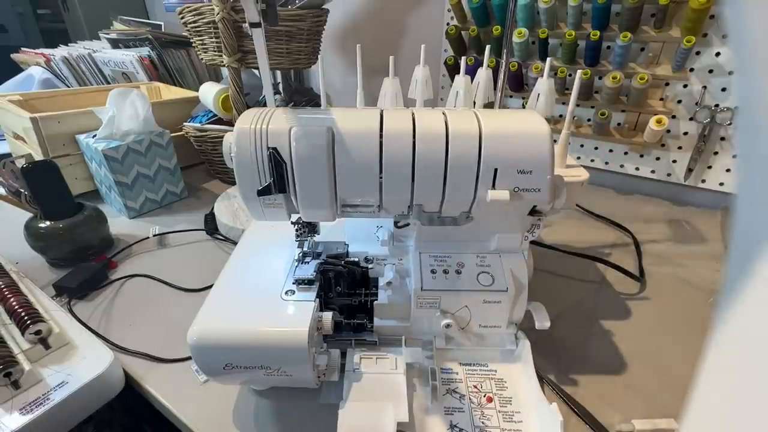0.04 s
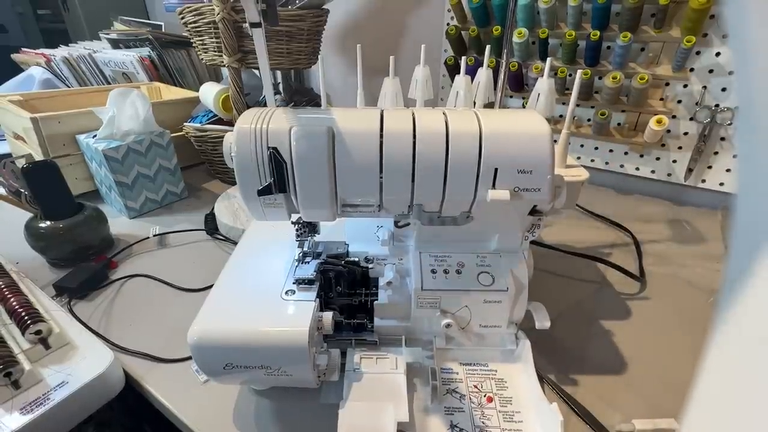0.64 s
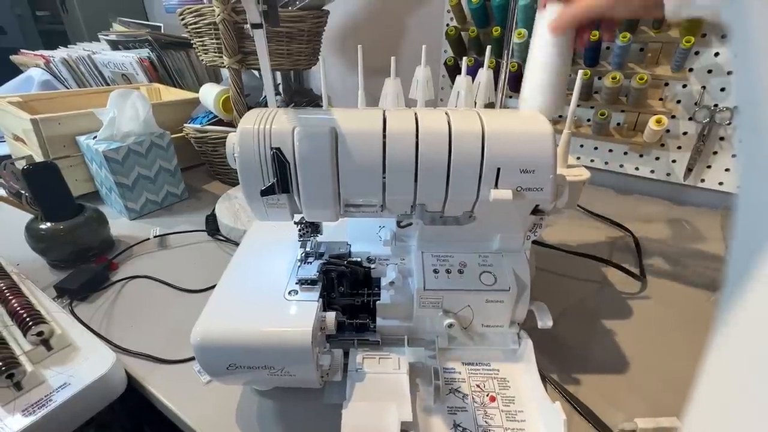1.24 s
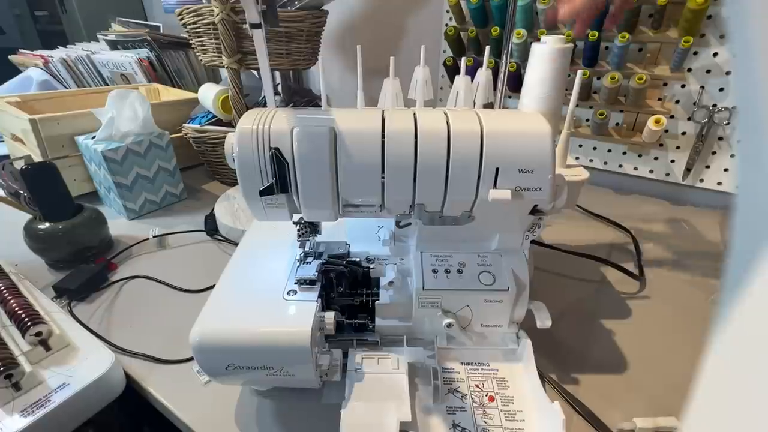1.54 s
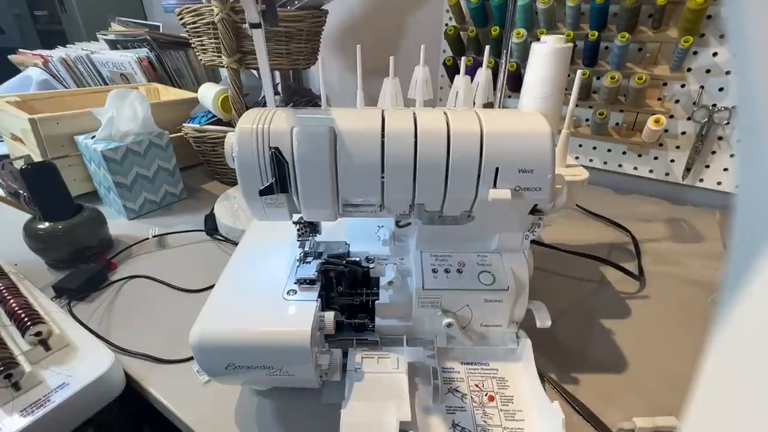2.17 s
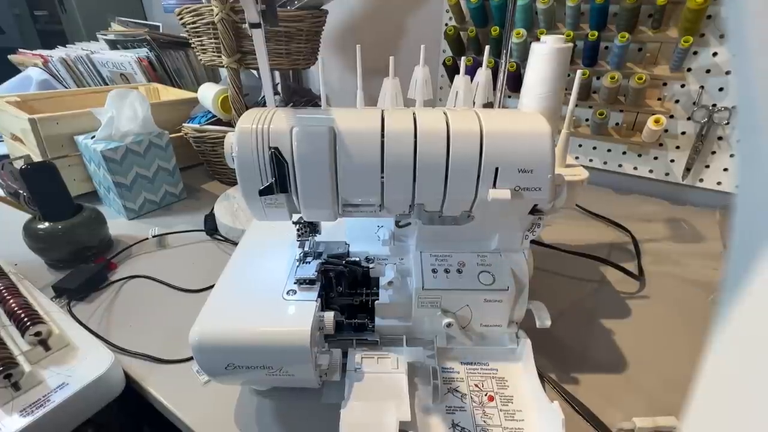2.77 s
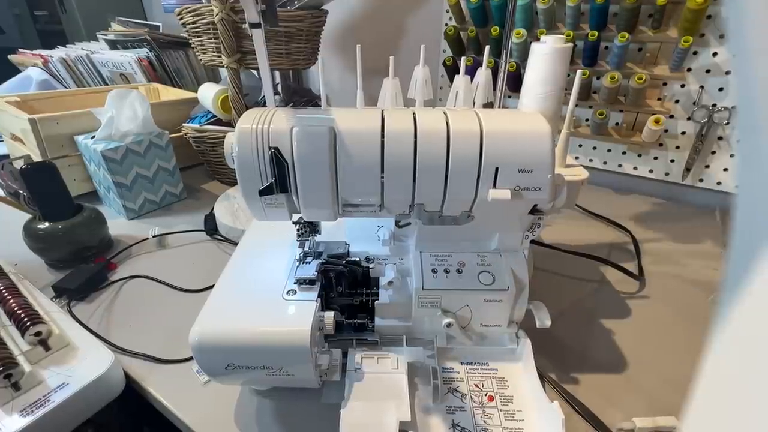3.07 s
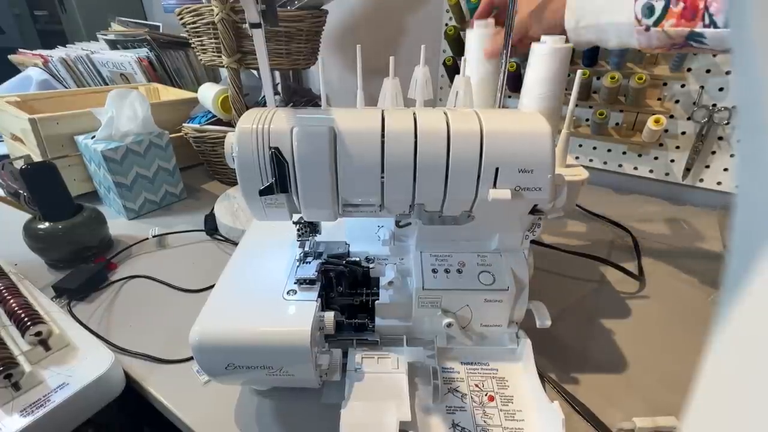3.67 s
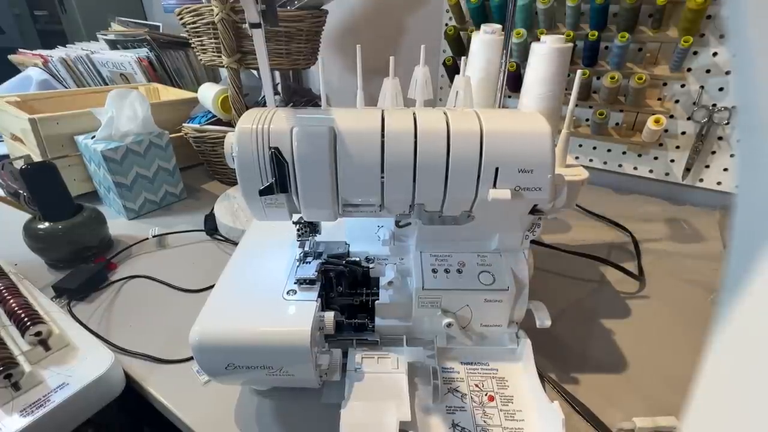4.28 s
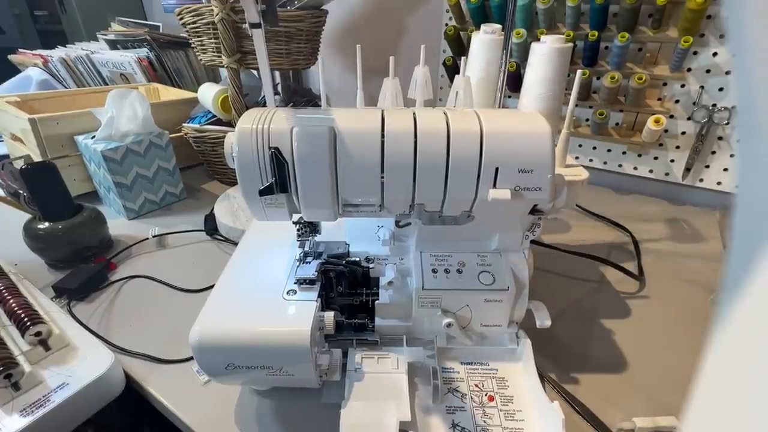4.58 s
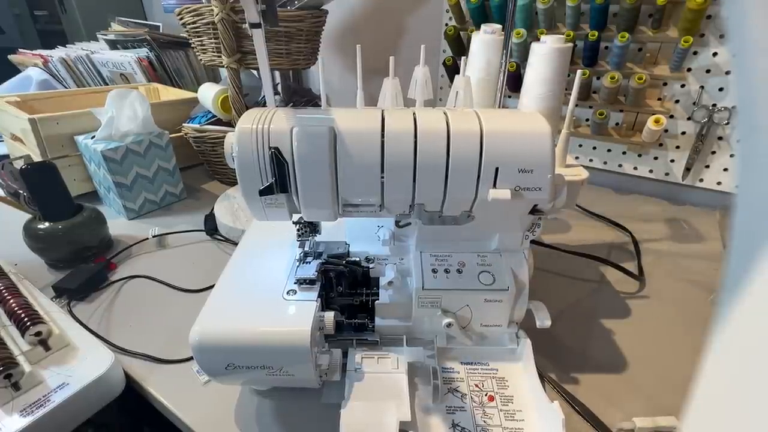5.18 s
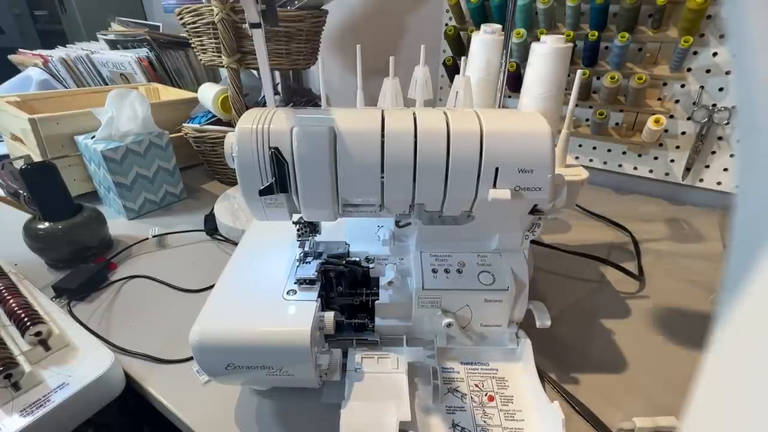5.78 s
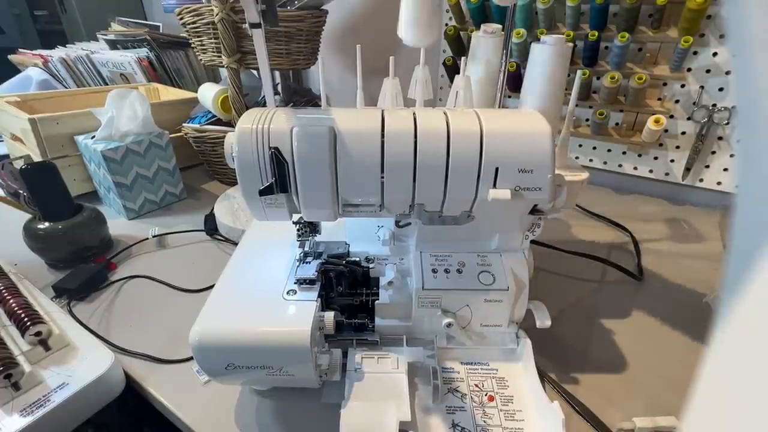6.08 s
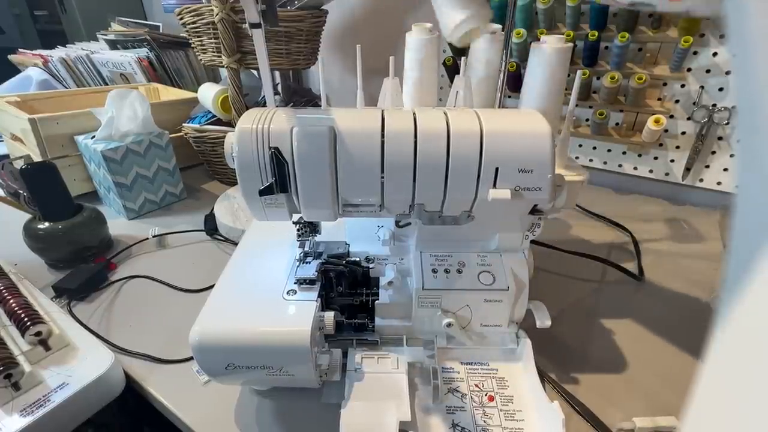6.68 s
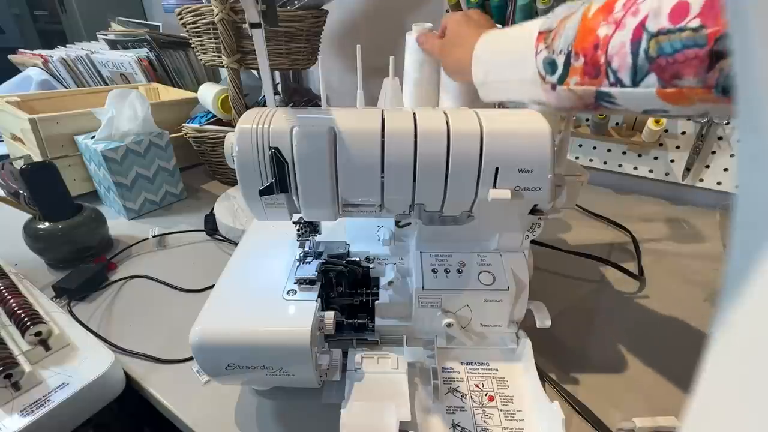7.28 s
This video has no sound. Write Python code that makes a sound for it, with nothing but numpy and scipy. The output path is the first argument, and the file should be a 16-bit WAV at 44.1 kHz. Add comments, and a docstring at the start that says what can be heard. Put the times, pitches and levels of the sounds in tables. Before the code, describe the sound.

A faint mains hum runs through a small, dry room; the handling is close and slightly to the right. A sleeve swishes softly at the start, with light bumps of loose plastic thread cones until about 0.9 seconds. At 1.2 a cone taps a sewing machine's spool pin, scrapes down and lands at 1.3 with a hollow knock that shakes housing and table. Between 2.2 and 2.5 another cone is picked up farther off, with clicks and a tiny squeak. It judders down its pin around 3.6, knocks firmly at 3.7 and settles with a small bump. Soft brushing and light clacks follow near 4.5 and 5.2. From 6.2 come short plastic scrapes, groans and taps, then a thin, bright ping from a clipped pin at 6.5. A cone clacks at 7.0, rubs down and lands at 7.2 with the loudest knock.

```python
"""A small, dry room with a sewing machine, over a faint mains hum.
Plastic thread cones are slid down the spool pins: each taps its pin, scrapes down in stick-slip
and lands with a hollow knock that shakes housing and table. A free pin is clipped and pings.
In between, a sleeve swishes and cones are picked up a little farther off; one squeaks."""
import sys
import numpy as np
from scipy import signal
from scipy.fft import rfft, irfft, next_fast_len
from scipy.io import wavfile

SR = 44100
rng = np.random.default_rng(int(sys.argv[2]) if len(sys.argv) > 2 else 0)


def int16_out(signal):
    """Quantize to a 16-bit WAV file."""
    q = np.round(np.clip(np.atleast_2d(signal).T, -1, 1) * 32767)
    wavfile.write(sys.argv[1], SR, q.astype(np.int16))


N = 327310


def amp(db):
    """Decibels to gain."""
    return 10 ** (np.asarray(db) / 20)


def unit_rms(x):
    """Scale to rms 1."""
    return x / np.sqrt(np.mean(x ** 2) + 1e-20)


def log_interp(points, hz):
    """Interpolate (freq_hz, value) points on a log frequency axis."""
    freqs, values = np.transpose(points)
    return np.interp(np.log(hz + 1), np.log(freqs + 1), values)


def jitter(t, rate_hz):
    """Random curve, rate_hz points a second."""
    return np.interp(t * rate_hz, np.arange(1024), rng.standard_normal(1024))


def fade(t, edge_s):
    """Envelope with linear edges."""
    return np.clip(np.minimum(t, t[-1] - t) / edge_s, 0, 1)


def add(track, start_s, sound):
    """Mix a sound into the track."""
    part = track[:, round(start_s * SR):][:, :sound.shape[-1]]
    part += sound[..., :part.shape[-1]]


def filtered(x, response):
    """Apply a complex frequency response."""
    size = x.shape[-1]
    padded = next_fast_len(size + 4096)
    return irfft(rfft(x, padded) * response(np.fft.rfftfreq(padded, 1 / SR)), padded)[..., :size]


def noise(spectrum, size, apart_hz=1500):
    """Coloured stereo noise, rms 1: channels alike in the bass, unrelated in the treble."""
    def response(hz):
        angle = np.pi / 4 * hz / (hz + apart_hz)
        return amp(log_interp(spectrum, hz)) * np.array([np.cos(angle), np.sin(angle)])
    mid, side = filtered(rng.standard_normal((2, size)), response)
    return unit_rms(np.array([mid + side, mid - side]))


def ring(modes, t, tuning, attack_s, scatter_db, crest_s=0.003):
    """Damped modes, frequencies times tuning, loosely in phase at the crest; strengths vary per blow."""
    freq, db, t60_s = np.transpose(modes)[:, :, None]
    hz = freq * tuning
    phases = 0.5 * rng.standard_normal(hz.shape)
    stereo_phases = rng.standard_normal((2, len(modes), 1)) * np.minimum(hz / 2200, 2)
    strengths = amp(db + scatter_db * rng.standard_normal(db.shape)) / np.linalg.norm(amp(db))
    waves = np.sin(2 * np.pi * hz * (t - crest_s) + phases + stereo_phases)
    return (strengths * amp(-60 * t / t60_s) * waves).sum(axis=1) * (1 - np.exp(-t / attack_s))


def burst(spectrum, t, attack_s, t60_s):
    """Dense, short-lived modes, heard as decaying noise."""
    return noise(spectrum, len(t)) * (1 - np.exp(-t / attack_s)) ** 2 * amp(-60 * t / t60_s)


# room decay: freq_hz, t60_s
ROOM_DECAY = [(100, 0.6), (300, 0.29), (500, .22), (800, 0.22), (2000, 0.23), (6000, 0.26), (14000, 0.15)]
def in_room(x, wet_db, build_s=0.0016):
    """Direct sound plus a diffuse tail, each frequency dying at its own rate."""
    diffuse = noise([(20, 0.0025), (20000, 0.003)], SR // 2, apart_hz=350)
    hz, t, bands = signal.stft(diffuse, SR, nperseg=256)
    decay = amp(-60 * t / log_interp(ROOM_DECAY, hz)[:, None])
    _, tail = signal.istft(bands * decay * (1 - np.exp(-t / build_s)), SR, nperseg=256)
    out = amp(wet_db) * signal.fftconvolve(x, tail / np.linalg.norm(tail[0]), axes=1)
    add(out, 0, x)
    return out


# mains harmonics: freq_hz, level_db
MAINS_HUM = [(120, -66.5), (240, -68), (360, -84), (1560, -89.5), (1800, -84.5)]
# still air and low rumble: freq_hz, density_db
AIR_SPECTRUM = [(25, -21.5), (100, -3.5), (170, -11), (250, -6.5), (420, -21.5), (700, -20), (1300, -18),
                (1750, -12), (2300, -19), (3500, -28.5), (10000, -34.5), (12500, -24.5), (16000, -38)]
RUMBLE_SPECTRUM = [(20, -22.5), (60, 6), (95, -2), (128, 1.5), (170, -9), (260, -10.5), (420, -32.5),
                   (1000, -68.5)]
# soft nudges of the table: centre_s, level_db
TABLE_NUDGES = [(.53, -65), (2.38, -57), (2.53, -59.5), (4.54, -57), (5.18, -56.5), (5.84, -66)]
def background(air_db=-74, rumble_db=-72, nudge_half_s=0.067):
    """Mains hum, still air and a rumble that swells when the table is nudged."""
    t = np.arange(N) / SR
    hum = sum(amp(db) * np.sin(2 * np.pi * (hz * t + rng.random())) for hz, db in MAINS_HUM)
    swells = sum(amp(db) * np.exp(-np.minimum(((t - centre_s) / nudge_half_s) ** 2, 50))
                 for centre_s, db in TABLE_NUDGES)
    rumble = (amp(rumble_db) + swells) * noise(RUMBLE_SPECTRUM, N)
    return hum + rumble + amp(air_db) * noise(AIR_SPECTRUM, N)


# cloth hiss and fibre fizz: freq_hz, density_db
CLOTH_SPECTRUM = [(150, -7), (400, -9), (1000, -12), (2000, -10.5), (3500, -17), (7000, -19), (10000, -30),
                  (12500, -21.5), (16000, -31)]
FIBRE_SPECTRUM = [(2000, -27), (8000, -9), (10000, -19), (12000, 3.5), (14300, -19), (16000, -11)]
# brush strokes: start_s, end_s, cloth_db, fibre_db
SLEEVE_STROKES = [(-.05, 0.068, -59, -69.5), (0.09, 0.304, -62.5, -72.5), (0.416, 0.497, -65.5, -77),
                  (0.53, 1.18, -76.5, -94), (1.734, 2.244, -66, -85), (2.748, 3.062, -79, -81),
                  (3.122, 3.189, -78, -69), (4.304, 4.47, -80.5, -82), (4.8, 4.95, -81, -74),
                  (5.66, 5.714, -78, -80), (5.8, 6.198, -73.5, -83.5)]
def sleeve_swishes(edge_share=0.37, uneven_db=3, uneven_hz=30):
    """Sleeve and fingers brush unevenly over the thread; fine fibres add a high fizz."""
    out, t = np.zeros((2, N)), np.arange(N) / SR
    cloth, fibres = noise(CLOTH_SPECTRUM, N), noise(FIBRE_SPECTRUM, N)
    for start_s, end_s, cloth_db, fibre_db in SLEEVE_STROKES:
        edge_s = edge_share * (end_s - start_s)
        stroke = np.clip(np.minimum(t - start_s, end_s - t) / edge_s + 0.5, 0, 1)
        out += stroke * (amp(cloth_db) * cloth + amp(fibre_db) * fibres)
    return out * amp(uneven_db * jitter(t, uneven_hz))


# dense plastic modes and hard contact, also in slides and knocks: freq_hz, density_db
CLACK_SPECTRUM = [(60, -40), (350, -15.5), (700, -2.5), (1350, -0.5), (2100, -2.5), (2700, -15.5),
                  (4500, -35), (9000, -52)]
CLICK_SPECTRUM = [(500, -33.5), (1800, -3), (3000, 1.5), (4600, 1), (5200, -1), (5900, 2), (6900, -2),
                  (7500, -13), (8400, -4), (10000, -9.5), (12000, 2), (14300, -11.5), (15600, -10.5)]
# stiff cone rim, also in knocks: nominal_hz, relative_db, t60_s
RIM_MODES = [(2493, 1, .05), (3015, -5.5, .04), (3240, -3, .045), (3720, 0.5, 0.039), (4030, -5, .035),
             (4500, -3, 0.04), (4900, -1, 0.04), (5740, -4.5, 0.045), (5895, -5, 0.043), (6980, -5.5, .04)]
# cone in the hand: freq_ratio, relative_db, t60_s
LOOSE_CONE_MODES = [(1, 3, 0.044), (1.2, -10, 0.022), (1.55, -4.5, 0.034), (1.95, -7.5, 0.029)]
# bumps of loose cones: start_s, ring_db, pitch_hz, click_db
CONE_PICKUPS = [(.275, -46, 485, -90), (0.355, -47, 714, -76), (.743, -36, 519, -90),
                (.9, -51.5, 520, -81.5), (2.184, -35.5, 530, -65), (2.405, -50.5, 918, -60),
                (2.48, -41, 1600, -50.5), (2.493, -44, 1300, -47.5), (4.408, -52, 940, -73),
                (4.443, -57, 1610, -73), (4.518, -40.5, 1076, -52), (4.552, -50, 570, -65.5),
                (4.594, -59, 952, -62.5), (5.151, -41, 956, -59.5), (5.158, -41, 420, -75.5),
                (5.187, -49.5, 538, -56)]
def cone_pickups(t60_s=0.063, lowpass_hz=7000):
    """Loose cones bump lightly, far enough off that the room is about as loud as the bump."""
    out, t = np.zeros((2, N)), np.arange(SR // 4) / SR
    for start_s, ring_db, pitch_hz, click_db in CONE_PICKUPS:
        body = amp(ring_db - 2) * ring(LOOSE_CONE_MODES, t, pitch_hz, attack_s=0.00046, scatter_db=1.5)
        rattle_db = ring_db - 6 + 0.33 * (click_db - ring_db + 19.5)
        rattle = amp(rattle_db) * burst(CLACK_SPECTRUM, t, attack_s=0.0017, t60_s=t60_s)
        contact = burst(CLICK_SPECTRUM, t, attack_s=0.0014, t60_s=t60_s)
        rim = amp(-7) * ring(RIM_MODES, t, tuning=0.83, attack_s=0.00047, scatter_db=4)
        add(out, start_s, in_room(body + rattle + amp(click_db) * (contact + rim), wet_db=-1))
    return filtered(out, lambda hz: 1 / (1 + 1j * hz / lowpass_hz))


# squeak partials: harmonic, level_db
SQUEAK_HARMONICS = [(1, -55.5), (2, -45), (3, -64), (4, -57), (5, -58), (6, -52.5)]
def cone_squeak(start_s=2.48, length_s=0.0274, pitch_hz=820, waver=0.045, waver_hz=700):
    """A cone is pulled off its peg; the slips briefly lock into an unsteady pitch."""
    out, t = np.zeros((2, N)), np.arange(round(length_s * SR)) / SR
    phase = 2 * np.pi * np.cumsum(pitch_hz * (1 + waver * jitter(t, waver_hz))) / SR
    tone = sum(amp(db) * np.sin(harmonic * phase) for harmonic, db in SQUEAK_HARMONICS)
    add(out, start_s, in_room(np.array([tone, tone]) * fade(t, edge_s=0.003), wet_db=-2))
    return out


# free spool pin: nominal_hz, relative_db, t60_s
PIN_MODES = [(2016, -3, 0.15), (2110, 0, 0.055), (3020, -8, 0.05), (3801, -9, .05), (5640, -9, 0.058),
             (5712, -9, .1), (5900, -10, .11), (6100, -10, 0.13), (6400, -11, .12)]
def pin_ping(start_s=6.456, level_db=-41):
    """A cone clips a free pin, which rings thin and bright."""
    out, t = np.zeros((2, N)), np.arange(SR // 3) / SR
    pin = amp(level_db) * ring(PIN_MODES, t, tuning=0.99, attack_s=0.00055, scatter_db=2)
    add(out, start_s, in_room(pin, wet_db=-5))
    return out


# groans and rattles: start_s, end_s, from_hz, to_hz, level_db, roughness (0-1)
FRICTION_CATCHES = [(1.208, 1.273, 1402, 1207, -50.5, .95), (2.444, 2.483, 1916, 1650, -51, .8),
                    (3.565, 3.636, 379.5, 320, -36.5, 0.59), (3.588, 3.634, 1098, 1251, -43, 0.91),
                    (3.887, 3.904, 347, 332, -43, .2), (6.212, 6.291, 355, 351, -43, 0.26),
                    (6.212, 6.28, 799, 680, -53, 0.98), (6.24, 6.286, 979, 1100, -49.5, 0.96),
                    (6.272, 6.365, 5940, 5650, -60, 0.5), (6.285, 6.299, 2530, 2510, -41.5, 0.3),
                    (6.286, 6.302, 1128, 1130, -42, .35), (6.31, 6.37, 1152, 1000, -55, .95),
                    (6.382, 6.406, 1710, 1940, -43, .4), (6.397, 6.422, 346, 335, -40.5, .15),
                    (6.971, 6.999, 1618, 1530, -40, .6), (6.975, 7.04, 221.6, 221.5, -42, 0.23),
                    (6.974, 7.056, 845, 842, -43, .45), (7.039, 7.082, 357, 355, -45, .4),
                    (7.061, 7.112, 906, 861, -51.5, 0.48), (7.146, 7.183, 1193, 964, -52, .7)]
def friction_catches(blur_share=0.35, flutter_db=5, flutter_hz=200, edge_s=0.007):
    """Friction locks onto one gliding resonance of cone or housing; rough slips blur it into a band."""
    out = np.zeros((2, N))
    for start_s, end_s, from_hz, to_hz, level_db, roughness in FRICTION_CATCHES:
        t = np.arange(round(max(end_s - start_s, edge_s) * SR)) / SR
        phase = 2 * np.pi * np.cumsum(np.linspace(from_hz, to_hz, len(t))) / SR
        blur_hz = blur_share * roughness * from_hz
        slips = 1 - roughness + roughness * (jitter(t, blur_hz) + 1j * jitter(t, blur_hz))
        flutter = amp(roughness * flutter_db * jitter(t, flutter_hz))
        tone = unit_rms(np.real(slips * np.exp(1j * phase)) * flutter)
        stroke = amp(level_db) * fade(t, edge_s)
        add(out, start_s, in_room(np.array([tone, tone]) * stroke, wet_db=-7))
    return out


# housing shaken by friction: freq_hz, density_db
JUDDER_SPECTRUM = [(40, -24), (120, -12), (180, -17), (270, 2.5), (350, 1.5), (430, -5.5), (560, -14.5),
                   (900, -19), (2500, -58)]
# cones rubbing along: start_s, end_s, judder_db, hiss_db
CONE_SLIDES = [(1.167, 1.272, -50, -57), (1.286, 1.332, -57, -60), (2.434, 2.518, -65, -63.5),
               (3.566, 3.633, -39, -61), (3.632, 3.713, -67, -63), (4.517, 4.612, -64, -74),
               (6.209, 6.292, -49.5, -72), (6.272, 6.305, -48.5, -55.5), (6.301, 6.419, -55.5, -61),
               (6.976, 7.073, -46.5, -70), (7.109, 7.195, -54, -59)]
def cone_slides(slip_hz=260, slip_db=4, ease_db=6):
    """Plastic sticks and slips: it shakes the housing, scrapes and hisses, easing off as it goes."""
    out = np.zeros((2, N))
    for start_s, end_s, judder_db, hiss_db in CONE_SLIDES:
        t = np.arange(round((end_s - start_s) * SR)) / SR
        slips = unit_rms(amp(slip_db * jitter(t, slip_hz)))
        stroke = fade(t, edge_s=0.014) * amp(ease_db * (0.5 - t / t[-1]))
        judder = amp(judder_db) * noise(JUDDER_SPECTRUM, len(t))
        scrape = amp((judder_db + hiss_db) / 2 + 0.5) * noise(CLACK_SPECTRUM, len(t))
        hiss = amp(hiss_db) * noise(CLICK_SPECTRUM, len(t))
        add(out, start_s, in_room((judder + scrape + hiss) * slips * stroke, wet_db=-4))
    return out


# table, housing with spool stand, hollow cone on its holder: nominal_hz, relative_db, t60_s
TABLE_MODES = [(61, -10, 0.3), (76.07, -9.5, 0.39), (97, -8, 0.22), (123.4, -3.5, 0.33), (140, -6, 0.11),
               (189, -1.5, .17), (232.6, 0.5, .17)]
HOUSING_MODES = [(255, -8.5, 0.13), (310, -12.5, 0.19), (338, -3, 0.1), (367, -1.5, 0.096),
                 (409, -2, 0.069), (436, -5.5, 0.1), (523.8, -7.5, 0.12), (575, -5, 0.07)]
SEATED_CONE_MODES = [(676, -3, 0.074), (794, 0.5, 0.06), (847.4, 0, 0.049), (1068, -2, .05),
                     (1170, -2.5, 0.051), (1227, -2, 0.041), (1389, -3, 0.06), (1528, -2.5, .06),
                     (1643, -7, 0.12), (1900, -13, 0.14), (2134, -14, 0.051), (2285, -14.5, 0.052)]
# cone against pin and machine: start_s, thud_db, clack_db, click_db, housing_tuning, damping_db
CONE_KNOCKS = [(1.163, -25.5, -33, -38.5, 0.96, -3), (1.318, -13.5, -14, -22, 0.95, 0),
               (3.549, -42, -36.5, -50.5, 1.2, -8), (3.561, -21, -26.5, -39.5, 0.88, 0),
               (3.572, -20, -27, -38, 0.97, -1), (3.59, -24, -34.5, -41, 1, 0),
               (3.602, -30, -38, -41.5, 1.03, 11), (3.697, -12, -18, -34.5, 0.99, 6.5),
               (3.87, -48, -54, -80, 0.97, 4), (3.885, -31, -37, -70.5, 0.97, 7.5),
               (6.206, -47.5, -49.5, -79, 0.83, 3), (6.289, -52, -45, -45, 0.96, 3),
               (6.365, -52, -46, -43.5, 1.2, 5), (6.386, -37.5, -37, -52.5, 0.85, -1.5),
               (6.404, -35.5, -53, -66, .88, 10), (6.455, -57, -46.5, -38, 0.97, 1),
               (6.904, -50.5, -53.5, -77, 0.92, -2), (6.969, -37, -27.5, -50, 0.72, 5.5),
               (7.087, -58, -47, -51, 0.72, 2), (7.099, -54, -46, -51, 0.57, -5),
               (7.184, -5.5, -14, -26, 1.09, 5.5)]
def cone_knocks(seat_s=0.014, grip_s=0.0011):
    """Each contact clicks, rings the cone and shakes housing and table; a hand damps the seated cone."""
    out, t = np.zeros((2, N)), np.arange(SR // 4) / SR
    for start_s, thud_db, clack_db, click_db, housing_tuning, damping_db in CONE_KNOCKS:
        seated = (1 + np.tanh((t - seat_s) / grip_s)) / 2
        grip = amp(-damping_db * seated)  # negative damping lifts the tail
        housing = ring(HOUSING_MODES, t, housing_tuning, attack_s=0.004, scatter_db=1.96, crest_s=0.006)
        table = ring(TABLE_MODES, t, tuning=0.98, attack_s=0.0041, scatter_db=3, crest_s=0.014)
        cone = ring(SEATED_CONE_MODES, t, tuning=0.99, attack_s=0.0021, scatter_db=1.5, crest_s=0.005)
        rattle = amp(-2) * burst(CLACK_SPECTRUM, t, attack_s=0.002, t60_s=0.095)
        rim = ring(RIM_MODES, t, tuning=0.99, attack_s=0.0018, scatter_db=1.5)
        contact = burst(CLICK_SPECTRUM, t, attack_s=0.0012, t60_s=0.052)
        table_db = 0.82 * clack_db - 19
        thud = in_room(amp(thud_db - 1) * grip * housing + amp(table_db) * table, wet_db=-12)
        clack = in_room(amp(clack_db) * grip * (cone + rattle) + amp(click_db - 8) * rim, wet_db=-5)
        click = in_room(amp(click_db + 3) * grip * contact, wet_db=-8)
        add(out, start_s, thud + clack + click)
    return out


# stereo balance: freq_hz, left_minus_right_db
STEREO_BALANCE = [(100, -3), (400, -5.8), (1200, -5.5), (2400, -2.5), (4400, -5.5), (8000, .5), (15000, .5)]
def scene(left_lag_s=0.0002403):
    """The spool stand is to the right: louder and earlier on that side."""
    sides = np.array([[0.5], [-0.5]])
    cones = (cone_knocks() + cone_pickups() + cone_slides()
             + friction_catches() + cone_squeak() + pin_ping())
    cones = filtered(cones, lambda hz: np.exp(-2j * np.pi * hz * sides * left_lag_s))
    mix = cones + sleeve_swishes() + background()
    return filtered(mix, lambda hz: amp(sides * log_interp(STEREO_BALANCE, hz)))


def record(dry, top_hz=16000):
    """Steep low-pass at the band limit."""
    return filtered(dry, lambda hz: 1 / np.sqrt(1 + (hz / top_hz) ** 160))


dry = scene()
out = record(dry)
int16_out(out)
```